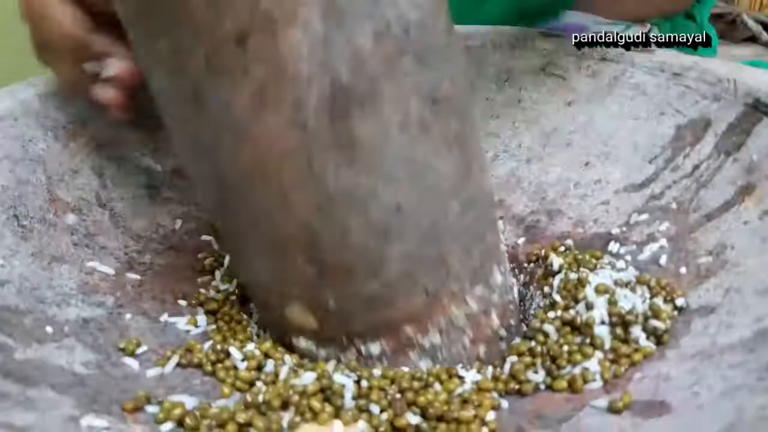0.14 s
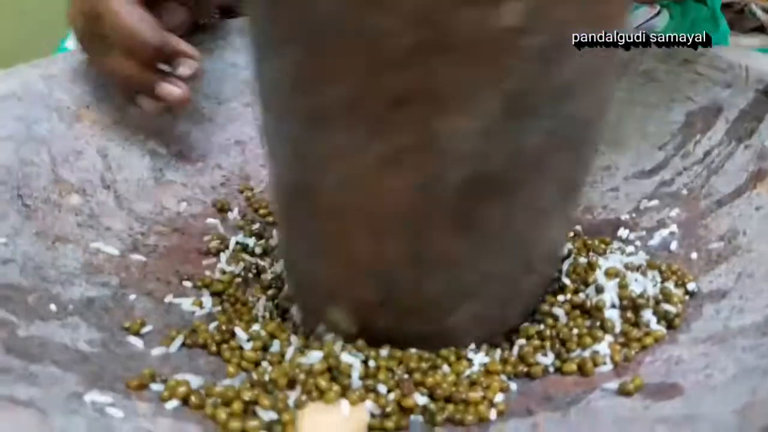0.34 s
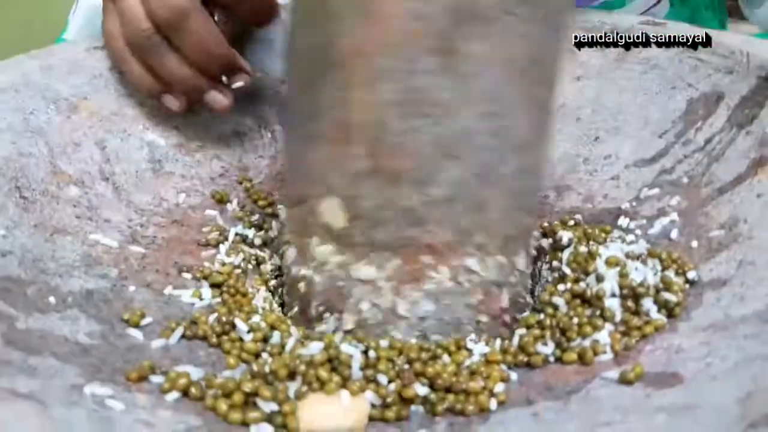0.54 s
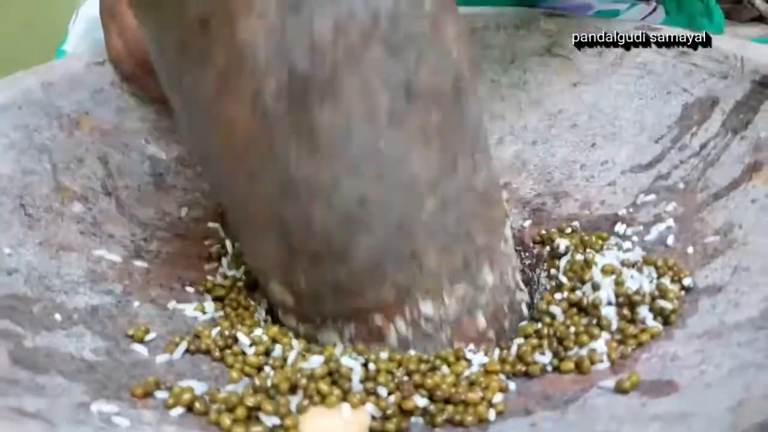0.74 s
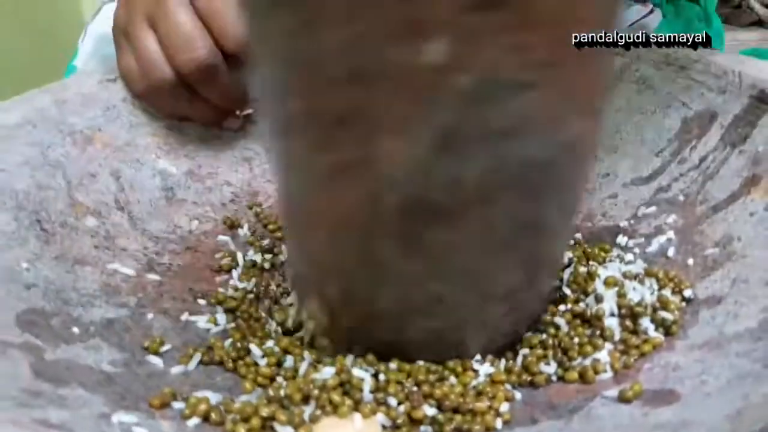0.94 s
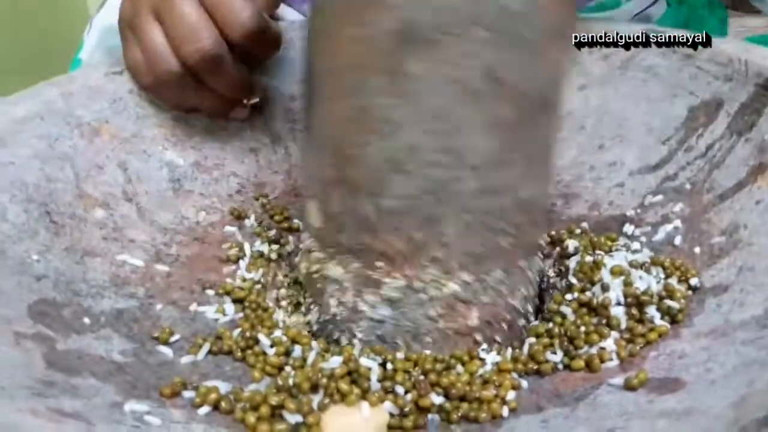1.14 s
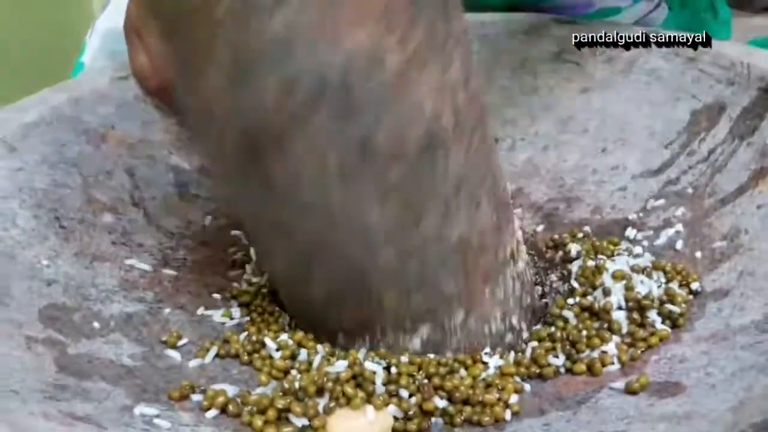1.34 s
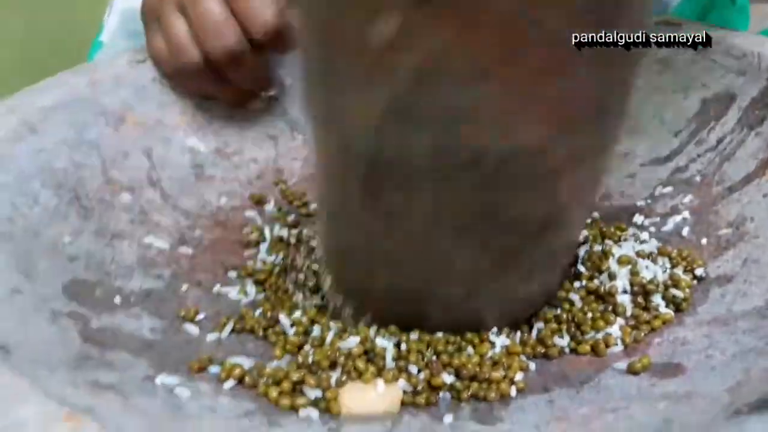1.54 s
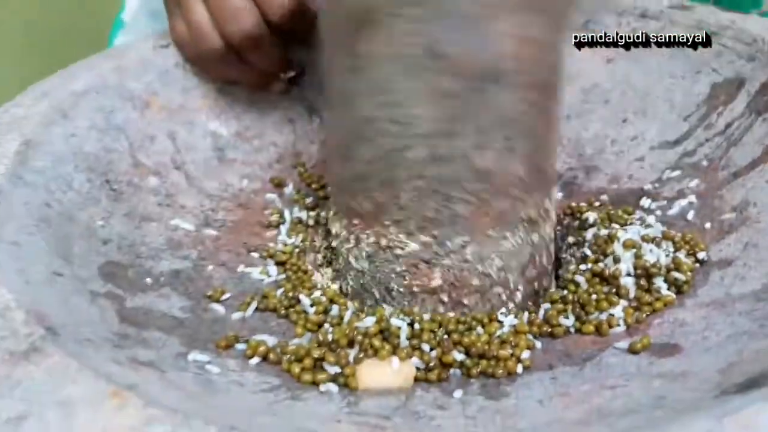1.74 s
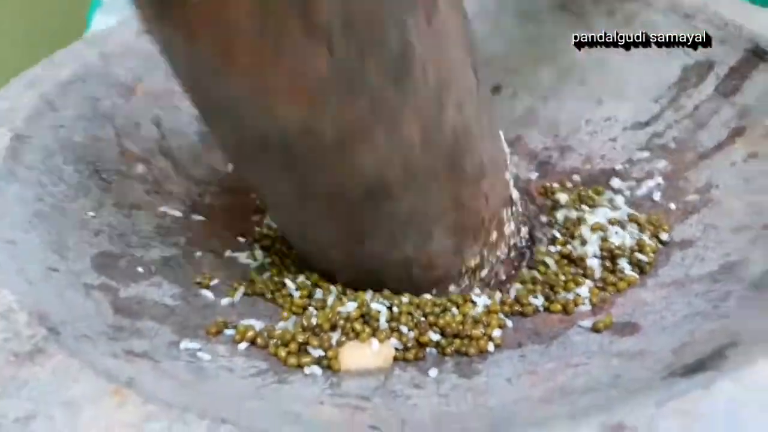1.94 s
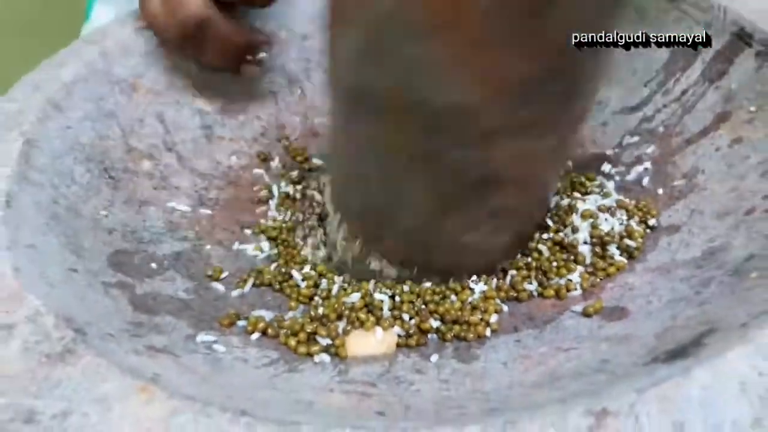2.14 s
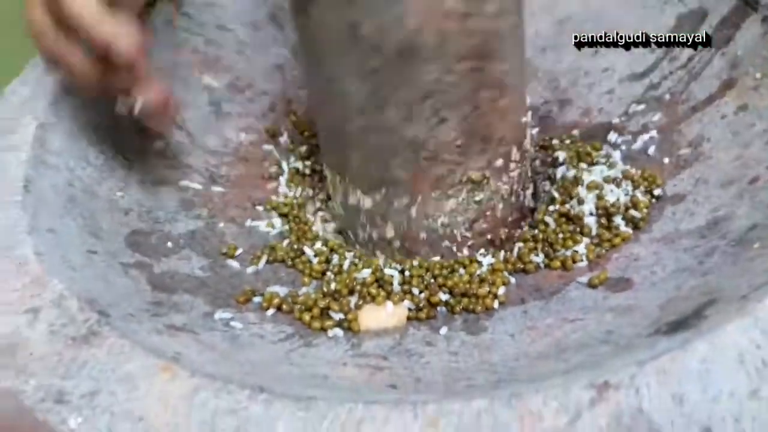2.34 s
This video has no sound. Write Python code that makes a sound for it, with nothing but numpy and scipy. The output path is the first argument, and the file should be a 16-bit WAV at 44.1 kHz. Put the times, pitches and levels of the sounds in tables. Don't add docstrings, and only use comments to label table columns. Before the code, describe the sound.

Close stereo sound of hand grinding in a kitchen: stone growls on stone and wet grains crunch in irregular surges, while dull, weighty knocks land every half second or so and husks snap sharply.

```python
import sys
import numpy as np
from scipy import signal
from scipy.fft import rfft, irfft, next_fast_len
from scipy.io import wavfile
from scipy.ndimage import uniform_filter1d, map_coordinates

SR = 44100
rng = np.random.default_rng(int(sys.argv[2]) if len(sys.argv) > 2 else 0)


def gain_from_db(level_db):
    decades = np.asarray(level_db, float) / 20
    return 10 ** decades


def master_out(mix):
    frames = np.transpose(np.atleast_2d(mix))
    ceiling = np.clip(frames, -1, 1)
    pcm = np.round(ceiling * 32767).astype(np.int16)
    wavfile.write(sys.argv[1], SR, pcm)


N = 110250
TIME_S = np.arange(N) / SR


def unit(x):
    return x / np.sqrt(np.mean(x ** 2) + 1e-20)


def along(points, hz):
    f, v = np.transpose(points)
    return np.interp(np.log(hz + 1), np.log(f + 1), v)


def wobble(rate_hz):
    return map_coordinates(rng.standard_normal(400), [TIME_S * rate_hz])


def filtered(x, response):
    m = next_fast_len(x.shape[-1] + 1024)
    spectrum = rfft(x, m) * response(np.fft.rfftfreq(m, 1 / SR))
    return irfft(spectrum, m)[..., :x.shape[-1]]


# f/Hz, correlation [0-1]
PORT_LIKENESS = [(60, 1), (500, 0.92), (1500, 0.87), (4000, 0.057), (12000, 0.2)]


def pair(a, b, colour):
    def response(hz):
        angle = np.arccos(np.clip(along(PORT_LIKENESS, hz), -1, 1)) / 2
        return gain_from_db(along(colour, hz)) * [np.cos(angle), np.sin(angle)]

    mid, side = filtered(np.array([a, b]), response)
    return unit(np.array([mid + side, mid - side]))


def patchy(depth_db):
    z = signal.stft(rng.standard_normal((2, N)), nperseg=256)[2]
    field = rng.standard_normal(z.shape[1:])
    field = uniform_filter1d(field, size=12, axis=0)
    field = uniform_filter1d(field, size=8, axis=1)
    return signal.istft(z * gain_from_db(depth_db * unit(field)), nperseg=256)[1][:, :N]


def swell_db(events, column):
    return sum(e[column] * np.exp(-((TIME_S - e[0]) / e[1]) ** 2) for e in events)


# f/Hz, t60/s
ROOM_DECAY = [(150, 0.57), (1000, 0.3), (8000, 0.46)]


def kitchen(x):
    hz, t, z = signal.stft(rng.standard_normal((2, SR // 2)), SR, nperseg=256)
    decay = gain_from_db(-60 * t / along(ROOM_DECAY, hz)[:, None])
    tail = signal.istft(z * decay, SR, nperseg=256)[1]
    tail = tail / np.linalg.norm(tail[0])
    late = np.pad(x, (200, 0))
    return signal.fftconvolve(late[None], tail, axes=1)[:, :N]


# t/s, half length/s, level/dB
BASE_THUMPS = [
    (0.15, 0.017, 4.5),
    (0.61, 0.023, 3.5),
    (1.207, 0.02, 9.5),
    (1.287, 0.018, 4),
    (1.842, 0.027, 5),
    (2.42, .03, 3),
    (1.68, 0.065, 6.5),
]
# f/Hz, level/dB per Hz
RUMBLE_COLOUR = [(18, -72), (30, -30), (125, 0), (270, -11), (450, -17), (580, -53), (990, -120)]


def rumble():
    level_db = 6.5 + swell_db(BASE_THUMPS, 2) + 1.66 * wobble(10.68)
    return gain_from_db(level_db) * pair(*patchy(1.7), RUMBLE_COLOUR)


# f/Hz, light-knock level/dB, heavy-knock level/dB, t60/s,
# change/dB per unit of lean, left over right/dB
BOWL_MODES = [(134.7, -19, -12, 0.68, -1, 2), (150.6, -28, -12.5, 0.52, -5.5, -0.5),
              (179.3, -15, -4, 0.37, -1.5, 3), (234.2, -1.5, -10.5, 0.19, 8.5, -0.5),
              (268.6, -1.5, -7.5, 0.38, -5.5, -2), (348.6, -11, -1, 0.12, -2, -4),
              (397, -13.5, -3.5, 0.14, 2, -1.5), (484.5, -4.5, -2, 0.041, -5.5, -8),
              (528.2, -3.5, -0.5, 0.16, -4.5, 1), (569.4, -25.5, -8.5, 0.15, 9, -2.5),
              (595, -24.5, -10, 0.12, -1, -11), (701, -21.5, -7, 0.037, -0.5, -1.5),
              (780, -19.5, -11.5, 0.052, 1, 5), (966, -32, -20, 0.057, .1, 3)]


def bowl_response(hz):
    total = 0
    for k, (mode_hz, _, heavy_db, t60, *_) in enumerate(BOWL_MODES):
        width_hz = 2.7 / t60
        resonance = 1j * hz * width_hz / (mode_hz ** 2 - hz ** 2 + 1j * hz * width_hz)
        total = total + (-1) ** k * gain_from_db(heavy_db) * resonance
    return total


def rattle():
    ringing = unit(filtered(rng.standard_normal(N), bowl_response))
    return gain_from_db(-11.5 + 3.2 * wobble(8.4)) * ringing


def groan():
    centre_hz, drift_hz, width_hz = 704, 69.97, 60
    cycles = np.cumsum(centre_hz + drift_hz * wobble(7)) / SR
    return unit(wobble(width_hz) * np.sin(2 * np.pi * cycles))


# f/Hz, level/dB per Hz
GROWL_COLOUR = [(300, -37), (480, -7.5), (700, -1), (950, -6.5), (1300, -28), (1700, -12), (2800, -120)]


def growl():
    return pair(*patchy(3.6), GROWL_COLOUR) + gain_from_db(-9.5) * groan()


GRAIN_BANDS = [2680, 4320, 5540, 7000, 9800, 12900, 14600]


def grains():
    per_s, spread_db, width_octaves = 300, 2.5, 0.47
    chance, size = rng.random((2, len(GRAIN_BANDS), 2, N))
    ticks = (chance < per_s / SR) * gain_from_db(-spread_db * np.log(size + 0.0075))
    ticks = ticks * rng.standard_normal(ticks.shape)
    centre_hz = np.array(GRAIN_BANDS)[:, None, None]

    def band(hz):
        return np.exp(-(np.log2((hz + 1) / centre_hz) / width_octaves) ** 2)

    return filtered(ticks, band).sum(0)


# f/Hz, level/dB per Hz
GRIT_COLOUR = [(650, 1.5), (1100, -4.5), (1750, -7.5), (5500, -1.5), (7130, -5.5), (8460, -17),
               (12400, -9.5), (15200, -16.5), (16500, -42)]


def grit():
    hiss = pair(*patchy(2.82), GRIT_COLOUR)
    hiss = hiss + gain_from_db(-6) * pair(*grains(), GRIT_COLOUR)
    return filtered(hiss, lambda hz: hz < 15700)


# t/s, rubbing level/dB, pressing level/dB
TURNING = [
    (0.0, -43, -41.5),
    (1.2, -45, -45),
    (1.87, -43, -45),
    (2.08, -48, -43),
    (2.5, -41, -44.5),
]
# t/s, half length/s, grit swell/dB, growl swell/dB
CRUSHED_HEAPS = [(0.009, 0.013, 9.5, 9), (0.135, 0.036, 10, 9.5), (0.219, 0.019, 7.5, 1),
                 (0.306, 0.038, 9.5, 7), (0.35, 0.018, 0.5, 6), (0.485, 0.011, 5, 8.5),
                 (0.545, 0.013, 8, 13.5), (0.594, 0.016, 5, 11), (0.693, 0.012, 7, 6),
                 (0.743, 0.022, 7.5, 6.5), (0.825, 0.021, 3, 2), (0.92, 0.044, 5.5, 8.5),
                 (0.947, 0.014, 1, 0), (1.01, 0.0081, -2, -1), (1.119, 0.065, 5, 3),
                 (1.19, 0.021, 5.5, 8.5), (1.27, 0.029, 5.5, 10.5), (1.374, 0.017, 8, -5),
                 (1.46, 0.035, 6.5, 10.5), (1.582, 0.019, 6, 7), (1.705, 0.035, 5.5, 8),
                 (1.782, 0.042, 6.5, 8), (1.831, 0.0057, 9, 13), (1.887, 0.021, 3.5, 4.5),
                 (2.001, 0.055, 10.5, 15.5), (2.147, 0.017, 5, 5), (2.297, 0.04, 4, 7),
                 (2.231, 0.019, 12.5, 9), (2.368, 0.026, 6, 9), (2.447, 0.014, 9, 15.5),
                 (2.49, 0.02, 7, 15)]


def grinding():
    t, rub_db, press_db = np.transpose(TURNING)
    grit_db = np.interp(TIME_S, t, rub_db) + 3 + swell_db(CRUSHED_HEAPS, 2) + 0.56 * wobble(44.7)
    growl_db = swell_db(CRUSHED_HEAPS, 3) + 2.2 * wobble(30.43)
    weight_db = np.interp(TIME_S, t, press_db) - 1
    low = gain_from_db(growl_db) * growl() + rattle() + rumble()
    return gain_from_db(grit_db) * grit() + gain_from_db(weight_db) * low


# t/s, level/dB, bright share/dB
CRACKED_HUSKS = [(.1304, -22, -3.5), (.169, -18, -4.5), (0.173, -25, 1), (0.218, -21, 0),
                 (0.223, -18, -2.5), (0.228, -22, 3), (.2598, -35, 0), (0.2673, -16.5, -2.5),
                 (0.276, -22, -13), (0.28, -19.5, -3.5), (.2998, -25.5, -10), (0.3404, -23.5, -1),
                 (0.5874, -17, -0.5), (0.6244, -19, -0.5), (0.7079, -10.5, -19), (0.7095, -30, -15),
                 (0.7843, -24.5, -6), (.787, -14, -0.5), (.813, -20.5, 0), (0.9017, -18, -1.5),
                 (1.1898, -18.5, -0.5), (1.196, -21, -1), (1.3876, -26, -16), (1.45, -18, -0.5),
                 (1.4535, -18.5, -2.5), (1.4742, -18.5, -2.5), (1.594, -25.5, -1), (2.352, -21.5, 1),
                 (2.4474, -26, -34), (2.4959, -40, -12),
                 (0.0132, -33, -1), (0.112, -26, -11), (0.1486, -36, 2), (0.3213, -26, -2),
             (0.384, -26.5, -3.5), (0.749, -28, 3), (0.917, -25.5, -1), (1.0123, -27.5, -1.5),
             (1.279, -31, -1.5), (1.3693, -30.5, 0.5), (1.4639, -26, -2), (1.467, -24, -3.5),
             (1.5785, -30, -10), (1.788, -29, 2), (1.83, -29, -2), (2.022, -24.5, -0.5), (2.2243, -27, -4),
             (2.2375, -32, 0), (2.3745, -31, 11), (2.4576, -33, 1), (0.4637, -30.5, -20), (0.898, -29, -11),
             (.96, -29, -8), (1.314, -32, -1), (1.3483, -41, -10), (1.6754, -33, -20), (1.826, -33, 2),
             (1.865, -39, -13), (1.994, -29.5, 6), (2.003, -34, 4), (2.1333, -39, 0), (2.2128, -33, -14)]
# f/Hz, level/dB
DULL_SNAP = [(1500, -60), (3000, -20), (5800, -1.5), (7500, -8), (8600, -44), (10000, -28)]
# f/Hz, level/dB
BRIGHT_SNAP = [(7500, -16.5), (9000, -8.5), (11500, -0.5), (14500, -2.5), (15800, -11), (16800, -46)]


def husks():
    rise_s, snap_t60, spray_t60, spray_db = 0.00065, 0.0032, 0.024, -13.5
    t = np.arange(SR // 20) / SR - 0.012
    snap_shape = np.where(t < 0, np.exp(-(t / rise_s) ** 2), gain_from_db(-60 * abs(t) / snap_t60))
    shape = snap_shape + gain_from_db(spray_db - 60 * abs(t) / spray_t60)
    out = np.zeros((2, N + SR))
    for at, db, bright_db in CRACKED_HUSKS:
        n = rng.standard_normal((4, len(t))) * shape
        bright = np.clip(gain_from_db(bright_db), 0, 1)
        dull = np.sqrt(1.02 - bright ** 2)
        snap = dull * pair(n[0], n[1], DULL_SNAP) + bright * pair(n[2], n[3], BRIGHT_SNAP)
        start = round((at + t[0]) * SR)
        out[:, start:][:, :len(t)] += gain_from_db(db + 9) * snap / abs(snap).max()
    return out[:, :N]


# t/s, peak level/dB, weight [0 light - 1 full], hardness/dB per octave, lean [-1 to 1]
ROLLER_KNOCKS = [(.106, -35, 0.8, -24, 0.14), (0.13, -23.5, 0.52, -4, 0.27), (.204, -6, 0.29, 0, 0.11),
                 (.393, -1.5, 1, 0.5, -0.67), (0.4376, -10, 0.37, 1.5, -0.36),
                 (.586, -23.5, 0.85, 3.5, 0.13), (.794, -9.5, 0.29, -3.5, 0.057), (.913, -6, 0.95, -3, 1),
                 (.962, -17, 0.46, -11, 0.78), (1.011, -28.5, 0.75, -9, 0), (1.186, -24.5, 1, -4, 0),
                 (1.263, -33.5, 0.75, -4, -0.15), (1.381, -38, 0.4, 14.5, -0.16),
                 (1.428, -27.5, 0.1, 4, -0.17), (1.491, -5, 0.2, 2, -0.037), (1.552, -3, 1, 0, -0.18),
                 (1.605, -15, 0.45, 0, 0.34), (1.823, -28, 0.5, 6.5, 0), (1.972, -26, .3, -1, 0.12),
                 (2.039, -3, 0.1, 2.5, -0.072), (2.104, -3, 1, -1.5, 0.91), (2.152, -19.5, 0.9, -4, -0.26),
                 (2.216, -19.5, 0.17, -8, -0.93), (2.352, -23, 0, 1, 0.25), (2.432, -29, .6, -1, 0.18)]
MODE_SIGNS = [-1, -1, 1, 1, 1, 1, -1, 1, -1, -1, 1, -1, 1, -1]
# f/Hz, level/dB
EDGE_COLOUR = [(500, -40), (900, -6), (1200, 3), (1500, -6), (2100, -11.5), (3000, -42)]


def knocks():
    contact_s, rise_s = 0.0015, 0.001
    free_s, settle_s, damped_db = 0.02, 0.001, -1.5
    rock_db, scatter_db = 4.5, 1.28
    edge_db, edge_t60 = -24.5, 0.059
    t = np.arange(SR // 3) / SR
    hz, light, heavy, t60, leaning, pan_db = np.transpose(BOWL_MODES)[:, :, None]
    settled = (1 + np.tanh((t - free_s) / settle_s)) / 2
    rise = 1 - np.exp(-(t / rise_s) ** 2)
    modes = np.array(MODE_SIGNS)[:, None] * np.sin(2 * np.pi * hz * (t - contact_s)) * rise
    pan = gain_from_db(np.array([[1], [-1]]) * pan_db.T / 2)
    out = np.zeros((2, N + SR))
    for at, db, weight, hard_db, lean in ROLLER_KNOCKS:
        chance = rng.standard_normal((len(BOWL_MODES), 16))
        knots = np.linspace(0, t[-1], 16)
        waver = np.array([np.interp(t, knots, row) for row in chance])
        level = light + np.clip(weight, 0, 1) * (heavy - light)
        level = level + lean * leaning + hard_db * np.log2(hz / 300)
        level = level + scatter_db * chance[:, :1] - 60 * t / t60
        level = level + settled * (damped_db * np.minimum(hz / 400, 1) + rock_db * waver)
        ring = pan @ (gain_from_db(level) * modes)
        edge = pair(*rng.standard_normal((2, len(t))), EDGE_COLOUR)
        edge = gain_from_db(edge_db + 2 * hard_db - 60 * t / edge_t60) * edge
        out[:, round(at * SR):][:, :len(t)] += gain_from_db(db - 6.5) * (ring + edge)
    return out[:, :N]


def scene():
    hits = knocks() + husks()
    return hits + gain_from_db(-14) * kitchen(hits.mean(0)) + grinding()


def microphone(x):
    lag_s, left_db = 0.00011, -1.5
    low_cut_hz, top_hz = 58, 16800
    side = np.array([[1], [-1]])

    def response(hz):
        low_cut = (1j * hz / (low_cut_hz + 1j * hz)) ** 3
        dip = gain_from_db(-1.5 * np.exp(-((hz - 8530) / 490) ** 2))
        port = gain_from_db(side * left_db / 2) * np.exp(1j * np.pi * hz * lag_s * side)
        return port * low_cut * dip * (hz < top_hz)

    return filtered(x, response)


def low_pass(x):
    return signal.sosfilt(signal.butter(12, 16800, fs=SR, output="sos"), x)


def record(dry):
    mix = microphone(dry)
    return low_pass(mix)


dry = scene()
out = record(dry)
master_out(out)
```